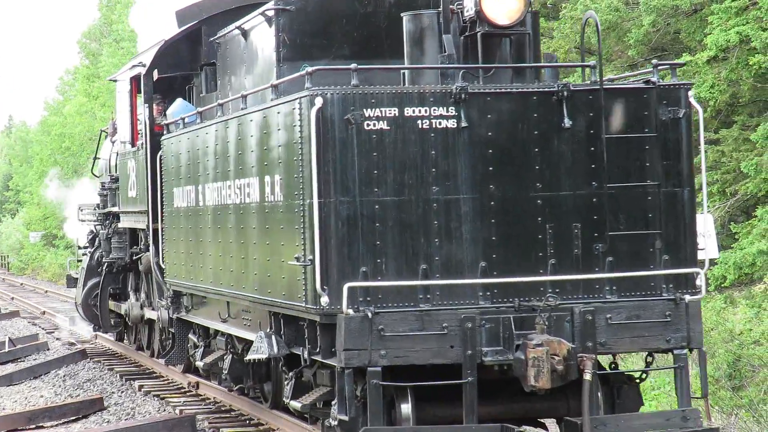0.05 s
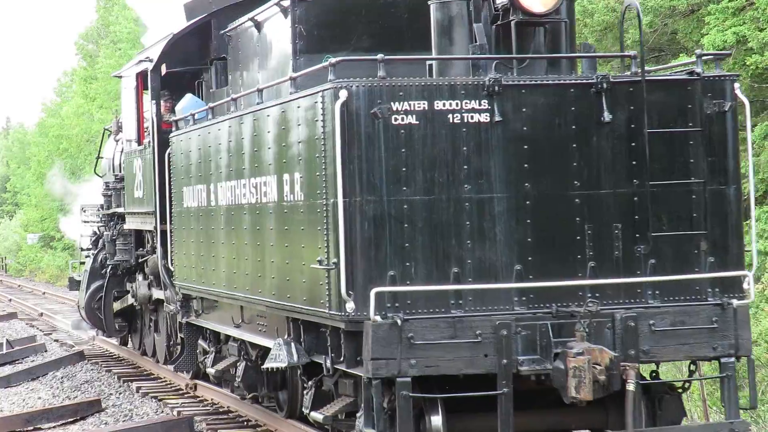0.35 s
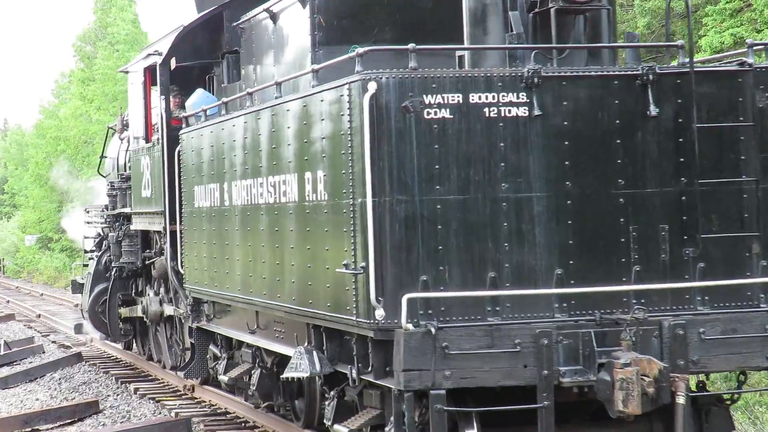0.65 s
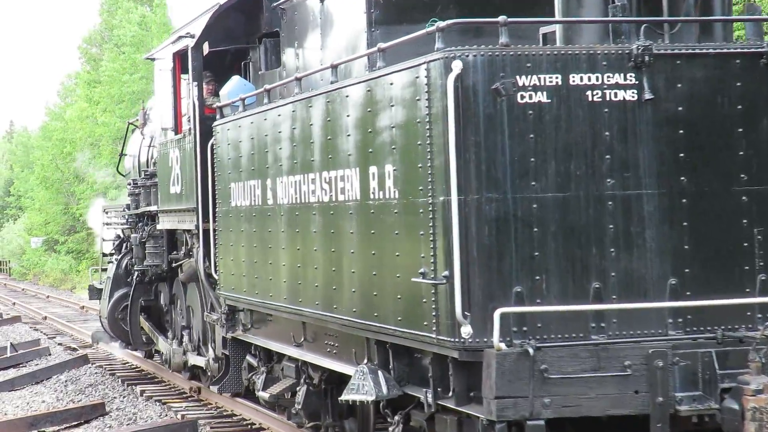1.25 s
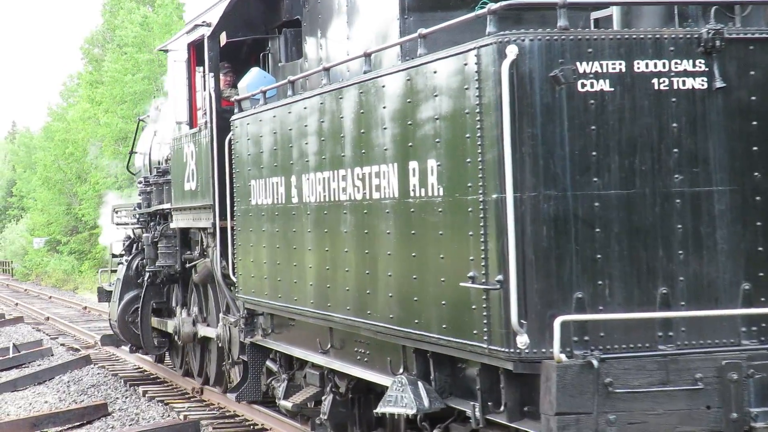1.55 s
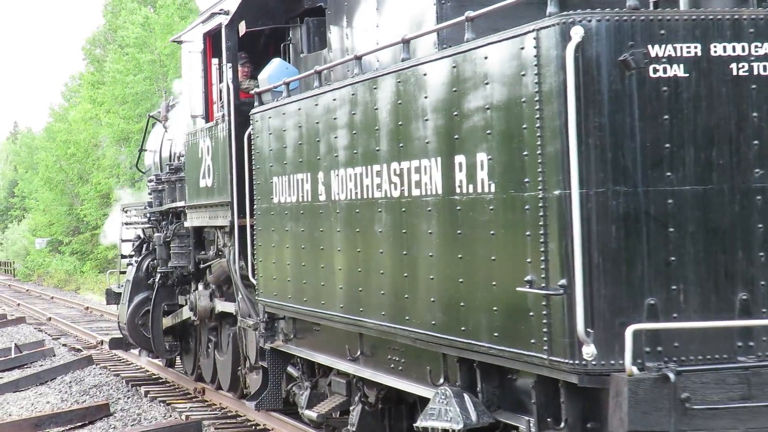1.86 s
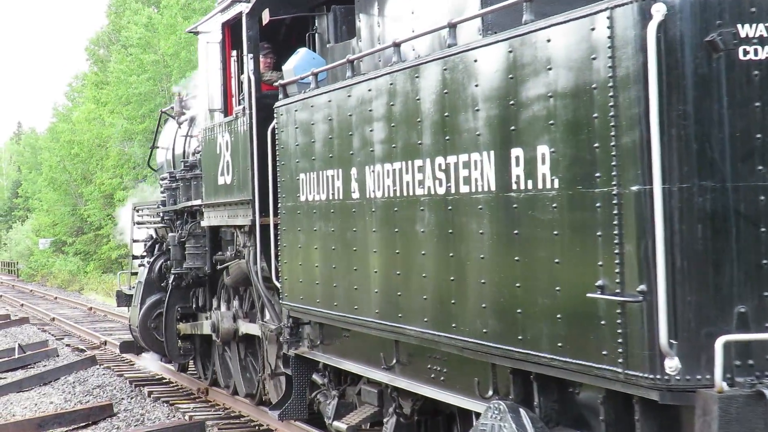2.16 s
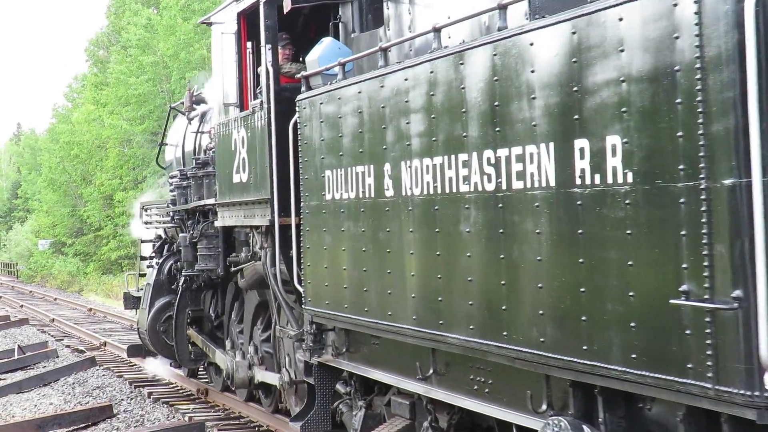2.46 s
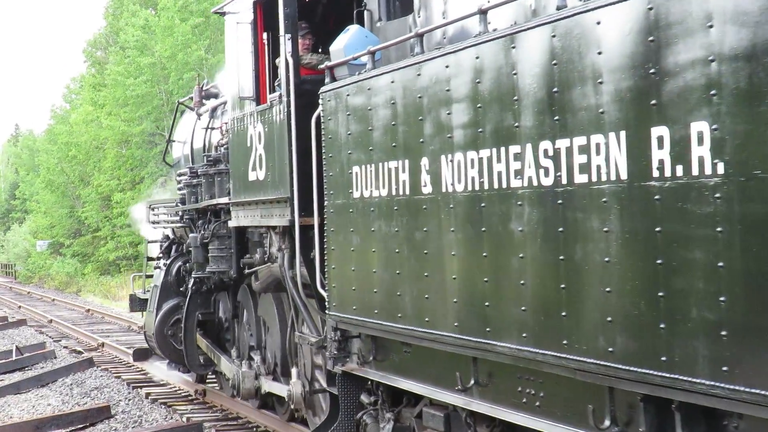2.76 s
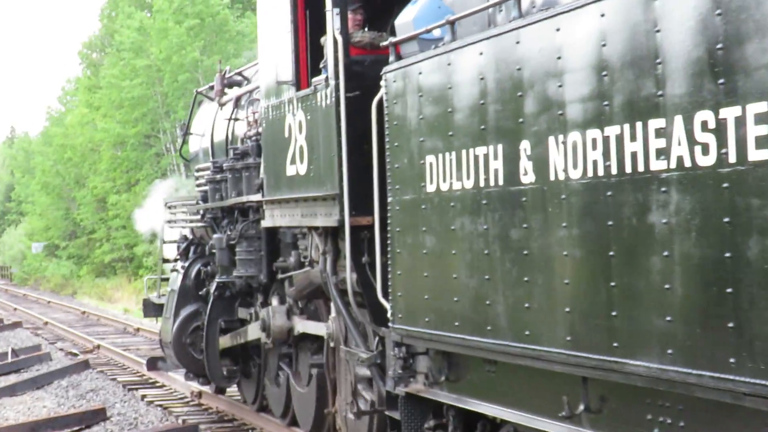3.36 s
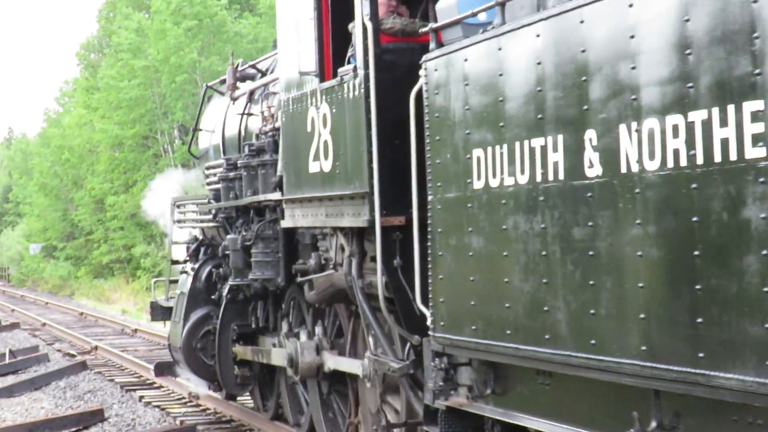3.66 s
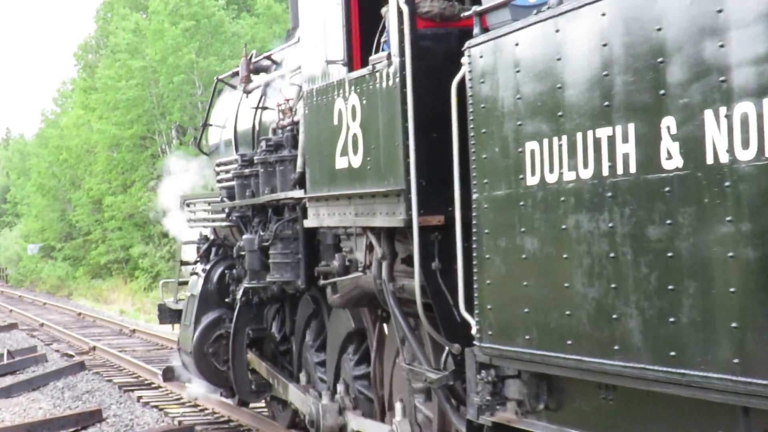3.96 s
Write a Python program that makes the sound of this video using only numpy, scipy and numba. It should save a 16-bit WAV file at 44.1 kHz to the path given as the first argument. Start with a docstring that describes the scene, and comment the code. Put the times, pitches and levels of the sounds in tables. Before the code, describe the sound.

A loud steam locomotive whistle holds one long, breathy chord over hiss and faint wheel rumble.

```python
"""A four-chime steam whistle sounds, held open, as a locomotive backs slowly past. Each chime is an air
column driven by a steam jet: more steam pulls the upper chimes sharp, brings out overtones and roar,
and overblows the third chime into a breathy flutter. Beneath it cylinder steam hisses, wheels rumble,
a flange squeals faintly and a few soft thumps sound. Gain control and a limiter even out the level."""
import sys
import numpy as np
from scipy import signal
from scipy.fft import rfft, irfft
from scipy.io import wavfile
from scipy.ndimage import uniform_filter1d
from numba import njit

SR = 44100
rng = np.random.default_rng(int(sys.argv[2]) if len(sys.argv) > 2 else 0)


def master_out(mix):
    """Clip the mix to full scale and print it as 16-bit PCM to the path in sys.argv[1]."""
    frames = np.transpose(np.atleast_2d(mix))
    ceiling = np.clip(frames, -1, 1)
    pcm = np.round(ceiling * 32767).astype(np.int16)
    wavfile.write(sys.argv[1], SR, pcm)


N = 176400

# steam supply to the whistle (time [s], opening [1 = full])
STEAM_OPENING = [(0, 0.06), (.22, 0.18), (.67, 0.29), (.8, 0.53), (1.22, .63), (1.46, .96), (2.3, 1.0),
                 (3.17, 1), (3.5, 0.65), (3.84, 0.73), (3.98, 1.04)]
# the two lowest chimes (time [s], pitch [Hz], level [dB])
LOW_CHIME = [(0, 385.8, -20), (.2, 381, -21), (.66, 383.4, -21.5), (.76, 391.2, -21), (1.33, 388.3, -24),
             (1.47, 387.1, -19.5), (2.0, 389, -21.5), (3.27, 389.2, -22), (3.45, 391.8, -20),
             (3.87, 394.4, -18), (4, 394, -21.5)]
MAIN_CHIME = [(0, 476, -22.5), (.3, 482.5, -17.5), (.45, 481, -17.5), (.85, 481.4, -16), (1.15, 477.7, -17),
              (1.55, 480.6, -12.5), (2.9, 484.6, -14), (3.33, 482, -12), (3.5, 478.2, -14.5),
              (3.85, 483.3, -14), (4, 482.2, -11.5)]
# overblown third chime (time [s], pitch [Hz], level [dB], roughness [0-1])
THIRD_CHIME = [(0, 517, -17.5, 0.13), (.23, 534, -18.5, .3), (.67, 541.9, -16, 0.14),
               (.735, 562.4, -16, 0.3), (1.0, 561, -15.5, 0.23), (1.09, 571, -16.5, .25),
               (1.22, 564, -15, .2), (1.33, 582, -18, .35), (1.42, 600, -22.5, 0.53), (1.51, 605, -31, .65),
               (3.13, 608.6, -29, .65), (3.43, 561.8, -28.5, 0.71), (3.6, 600.2, -29, 0.67),
               (4, 602.5, -28.5, 0.88)]
# top chime (time [s], level [dB])
TOP_CHIME_LEVEL = [(0, -29), (.6, -30.5), (.8, -36), (1.15, -38), (1.35, -31.5), (2.1, -32.5), (2.5, -28),
                   (3.1, -26), (3.45, -39.5), (3.85, -29), (4, -23)]
# third harmonics of the low and main chimes (time [s], level [dB])
LOW_TWELFTH_LEVEL = [(0, -53), (0.501, -44), (.72, -35.5), (1.2, -34.5), (1.451, -31), (1.85, -37.5),
                     (2.4, -38.5), (2.7, -30.5), (3.3, -29), (3.52, -35.5), (4, -30)]
MAIN_TWELFTH_LEVEL = [(0, -61), (.6, -55.5), (.75, -39.5), (1.0, -34), (1.17, -41), (1.46, -28.5),
                      (1.921, -30.5), (2.03, -27), (2.65, -27.5), (3.1, -31), (3.52, -37), (3.82, -35.5),
                      (4, -25.5)]
# overtones and combination tones (multiple of low chime [1], multiple of main chime [1])
OVERTONE_ORDERS = [(1, 2), (2, 1), (4, 0), (2, -1), (-1, 2), (0, 2), (3, -2), (4, 1), (3, 2), (0, 5),
                   (0, 4)]
# the same tones (level at full steam [dB], growth [dB per unit opening], roughness [0-1])
OVERTONE_LEVELS = [(-34.5, 27, 0.6), (-44.5, 11.5, 0.5), (-39, 19, 0.4), (-45.5, 26, 0.6), (-54.5, 2, .6),
                   (-42.5, 12, 0.3), (-55.5, 25.5, 0.2), (-54, 28, 0.1), (-52.5, 22, .4), (-54.5, 20, 0),
                   (-52.5, 23.5, 1)]
# resonances of the whistle's bells at full steam
# (centre [Hz], rise [Hz per unit opening], width [Hz], level [dB], growth [dB per unit opening])
BELL_RESONANCES = [(490.5, 5.05, 62, -30, -4.5), (582.5, 20, 67, -32, -6), (821, 70, 120, -37.5, -1.5),
                   (1165, 70, 70, -38, 1), (1419, 10, 66, -34, 23.5), (1585, 40, 160, -35, 10.5),
                   (1860, 60, 120, -40, 23.5), (2409, 60, 75, -47, 18)]
# gain of the roar as the engine draws nearer (time [s], gain [dB])
ROAR_NEARNESS = [(0, -2), (1.0, -1.5), (1.6, -0.7), (2.0, -1.2), (2.6, 0), (3.05, 2.2), (3.3, 3.3),
                 (3.48, 0.3), (3.78, 0), (4, 4)]
# spectra of jet, cylinder steam, engine, tender wheels and thumps (frequency [Hz], relative density [dB])
ROAR_SPECTRUM = [(90, -34.5), (170, -15), (280, -7), (430, 4), (700, -2.5), (1000, -1.5), (1600, -0.5),
                 (2200, -5.5), (3200, -11.5), (4200, -17), (5500, -25.5), (8000, -32.5), (12000, -42),
                 (15000, -60.5)]
HISS_SPECTRUM = [(800, -3.5), (2500, 2), (4300, -1), (6000, -0.5), (9000, -2.5), (12000, -5), (13500, -10),
                 (15000, -21.5)]
RUMBLE_SPECTRUM = [(20, -9.5), (45, -8), (80, -3.5), (135, 0.5), (220, -5), (400, -15.5), (900, -29.5)]
WHEEL_SPECTRUM = [(70, -29.5), (110, -13.5), (138, 1), (170, -3.5), (205, -3), (230, -11.5), (265, 3),
                  (340, 1), (600, -8), (1500, -32.5)]
THUMP_SPECTRUM = [(30, -12), (120, -8), (260, 1.5), (600, -3), (1500, -15), (2450, -8.5), (3300, -22),
                  (9000, -45.5)]
# envelopes of cylinder steam, engine rumble and tender wheels (time [s], level [dB])
HISS_ENVELOPE = [(0, -51.5), (.4, -55.5), (1.2, -55), (1.6, -50), (3.2, -56), (3.7, -56), (4, -65)]
RUMBLE_ENVELOPE = [(0, -60.5), (.6, -57), (1.3, -57), (2.2, -59.5), (3.2, -58.5), (3.7, -61), (3.85, -49.5),
                   (4, -45)]
WHEEL_ENVELOPE = [(0, -62), (1.0, -54), (1.5, -52), (2.3, -48.5), (2.8, -40.5), (3.1, -38), (3.33, -39),
                  (3.45, -44), (3.8, -45), (4, -32.5)]
# rubs of flange on rail (time [s], half-length [s], level [dB])
FLANGE_RUBS = [(.085, .02, -45), (.05, .06, -53), (.24, .03, -52), (.6, .06, -53)]
# natural modes of the wheel (frequency [Hz], relative level [dB])
WHEEL_RESONANCES = [(2320, 2), (3300, -11), (4170, -12)]
# soft low thumps (time [s], level [dB])
THUMPS = [(.275, -40), (.358, -39), (.705, -40), (.808, -29), (1.028, -36), (1.085, -34), (1.12, -34),
          (1.165, -33), (1.295, -30), (3.497, -27)]

TIME = np.arange(N) / SR
FREQS = np.fft.rfftfreq(N, 1 / SR)


def undb(db):
    """Amplitude ratio of a level in decibels."""
    return 10 ** (np.asarray(db) / 20)


def curve(rows, column=1):
    """Linear interpolation of one table column in time."""
    rows = np.array(rows, float)
    return np.interp(TIME, rows[:, 0], rows[:, column])


def unit(x):
    """Normalisation to an rms of 1."""
    return x / np.sqrt(np.mean(np.abs(x) ** 2))


def wander(rate_hz):
    """Random fluctuation of rms 1: noise low-passed steeply above rate_hz."""
    attenuation = np.sqrt((1 + (FREQS / rate_hz) ** 4) * (1 + (FREQS / rate_hz / 3) ** 4))
    return unit(irfft(rfft(rng.standard_normal(N)) / attenuation, N))


def noise(spectrum):
    """Spectral shaping of white noise, at rms 1."""
    hz, db = np.array(spectrum, float).T
    gain = undb(np.interp(np.log(FREQS + 1), np.log(hz), db))
    return unit(irfft(rfft(rng.standard_normal(N)) * gain, N))


def stereo_noise(spectrum, side_db, tilt_db):
    """Partly coherent noise: a side signal, set at 4 kHz and tilted per octave, gives width."""
    side_gain = undb(np.clip(side_db + tilt_db * np.log2((FREQS + 1) / 4000), -22, 3))
    mid = noise(spectrum)
    side = irfft(rfft(noise(spectrum)) * side_gain, N)
    return mid + side * np.array([[1], [-1]])


def phase_of(hz):
    """Phase as the time integral of frequency."""
    return 2 * np.pi * np.cumsum(hz) / SR


def tone(phase, rough, flutter_hz=12.1):
    """A sinusoid plus narrow-band noise flutters in level and phase; rough is the noise's rms share."""
    rough = np.clip(rough, 0, 1)
    flutter = wander(flutter_hz) * np.cos(phase) + wander(flutter_hz) * np.sin(phase)
    return np.sqrt(2 * (1 - rough ** 2)) * np.sin(phase) + rough * flutter


def chimes(steam):
    """Four jet-driven air columns oscillate; nonlinearity adds harmonics and combination tones."""
    waver_rad, waver_hz = .17, 15  # the jet shakes each chime's phase
    top_hz, top_rise_hz = 741.7, 86.7
    low = phase_of(curve(LOW_CHIME)) + waver_rad / 2 * wander(waver_hz)
    main = phase_of(curve(MAIN_CHIME)) + waver_rad * wander(waver_hz)
    third = phase_of(curve(THIRD_CHIME)) + waver_rad * 1.1 * wander(waver_hz)
    top = phase_of(top_hz + top_rise_hz * steam) + waver_rad * wander(waver_hz)
    main_rough = .08 + .42 * (1 - steam) ** 2  # weak steam flutters more
    third_db = curve(THIRD_CHIME, column=2)
    out = undb(curve(LOW_CHIME, column=2)) * tone(low, rough=.12)
    out += undb(curve(MAIN_CHIME, column=2)) * tone(main, main_rough)
    out += undb(third_db) * tone(third, rough=curve(THIRD_CHIME, column=3))
    out += undb(curve(TOP_CHIME_LEVEL)) * tone(top, rough=.45)
    out += undb(third_db - 13.5 - 11 * steam) * tone(2 * third - main, rough=1)  # cubic difference tone
    for phase, levels in ((low, LOW_TWELFTH_LEVEL), (main, MAIN_TWELFTH_LEVEL)):
        out += undb(curve(levels)) * tone(3 * phase, rough=.22)
    for (m, n), (db, growth_db, rough) in zip(OVERTONE_ORDERS, OVERTONE_LEVELS):
        out += undb(db + growth_db * (steam - 1)) * tone(m * low + n * main, rough)
    return out


def bell_resonances(steam):
    """Resonance filters turbulence into bands of noise, whose pitch rises with the steam."""
    out = np.zeros(N)
    for hz, rise_hz, width_hz, db, growth_db in BELL_RESONANCES:
        phase = phase_of(hz + rise_hz * (steam - 1))
        out += undb(db + growth_db * (steam - 1)) * tone(phase, rough=1, flutter_hz=width_hz / 2)
    return out


def jet_roar(steam):
    """Turbulent mixing radiates broadband noise, louder with more steam and at shorter range."""
    level_db = -29.5 + 12 * (steam - 1) + curve(ROAR_NEARNESS) + .9 * wander(25)
    return stereo_noise(ROAR_SPECTRUM, side_db=-12, tilt_db=2.5) * undb(level_db)


def cylinder_hiss():
    """Turbulence in steam escaping the cylinders radiates high-frequency noise."""
    hiss = stereo_noise(HISS_SPECTRUM, side_db=-.8, tilt_db=.5)
    return hiss * undb(curve(HISS_ENVELOPE) + .5 * wander(12))


def direct_path(whistle, right_lag_s, right_gain_db):
    """Differences in arrival time and level between the ears give the whistle its direction."""
    delayed = np.interp(TIME - right_lag_s, TIME, whistle)
    return np.array([whistle * undb(-right_gain_db / 2), delayed * undb(right_gain_db / 2)])


def forest_echo(whistle, decay_s, echo_db):
    """Scattering at the forest edge gives each ear its own exponentially decaying echo."""
    t = TIME[:SR // 2]
    tails = [unit(rng.standard_normal(len(t)) * np.exp(-t / decay_s)) / np.sqrt(len(t)) for _ in range(2)]
    sustained = np.concatenate([whistle[::-1], whistle])  # the echo is already sounding at the start
    return undb(echo_db) * np.array([signal.fftconvolve(sustained, tail)[N:2 * N] for tail in tails])


def running_gear():
    """Rolling contact radiates low noise from the engine and from the tender's wheels close by."""
    rumble = stereo_noise(RUMBLE_SPECTRUM, side_db=-17.5, tilt_db=2)
    rumble *= undb(curve(RUMBLE_ENVELOPE) + 1.2 * wander(7.1))
    wheels = stereo_noise(WHEEL_SPECTRUM, side_db=-4, tilt_db=3)
    wheels *= undb(curve(WHEEL_ENVELOPE) + wander(15))
    return rumble + wheels


def flange_squeal():
    """Friction between flange and rail briefly excites the wheel's natural modes."""
    rub = sum(undb(db) * np.exp(-((TIME - at) / half_s) ** 2) for at, half_s, db in FLANGE_RUBS)
    ring = sum(undb(db) * tone(2 * np.pi * hz * TIME, rough=.4, flutter_hz=25)
               for hz, db in WHEEL_RESONANCES)
    return rub * ring


def thumps(rise_s, decay_s):
    """Damped transients: bursts of low noise rise quickly and decay exponentially."""
    envelope = sum(undb(db) * np.clip((TIME - at) / rise_s, 0, 1) * np.exp(-np.abs(TIME - at) / decay_s)
                   for at, db in THUMPS)
    return envelope * noise(THUMP_SPECTRUM)


def scene():
    """Superposition of whistle, echo, steam noise and wheel noise in stereo."""
    steam = curve(STEAM_OPENING)
    whistle = chimes(steam) + bell_resonances(steam)
    steam_noise = jet_roar(steam) + cylinder_hiss()
    direct = direct_path(whistle, right_lag_s=1.6e-5, right_gain_db=.55)
    echo = forest_echo(whistle, decay_s=.11, echo_db=-28.5)
    low_noise = running_gear() + thumps(rise_s=.0036, decay_s=.012)
    return direct + echo + steam_noise + low_noise + flange_squeal()


def gain_control(x, target_db, window_s, strength):
    """Compression: the running rms level is pulled part of the way to a target."""
    size = int(window_s * SR)
    power = uniform_filter1d(uniform_filter1d(np.mean(x ** 2, axis=0), size), size)
    return x * (undb(target_db) / np.sqrt(power + 1e-12)) ** strength


@njit
def follow_peaks(x, attack_s, release_s):
    """Envelope detection with a fast rise and a slow fall."""
    out, level = np.empty(len(x)), 0.
    for i in range(len(x)):
        level += (x[i] - level) / (SR * (attack_s if x[i] > level else release_s))
        out[i] = level
    return out


def record(dry):
    """Compression evens the level, a limiter ducks the highest peaks, low-pass filters cut the top."""
    peak_limit, roll_off_hz, cut_hz = .6, 13600, 15100
    even = gain_control(dry, target_db=-11.5, window_s=.02, strength=.37)
    peaks = follow_peaks(np.abs(even).max(axis=0), attack_s=.0002, release_s=.04)
    limited = even * peak_limit / np.maximum(peaks, peak_limit)
    softened = signal.sosfilt(signal.butter(6, roll_off_hz, fs=SR, output="sos"), limited)
    return signal.sosfilt(signal.ellip(8, .2, 70, cut_hz, fs=SR, output="sos"), softened)


dry = scene()
out = record(dry)
master_out(out)
```